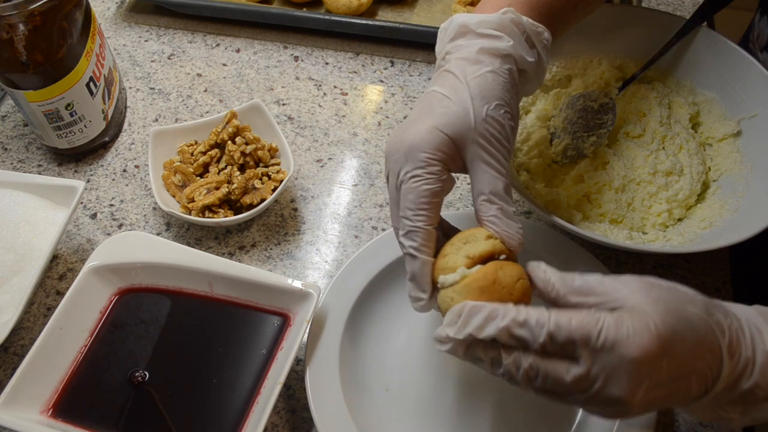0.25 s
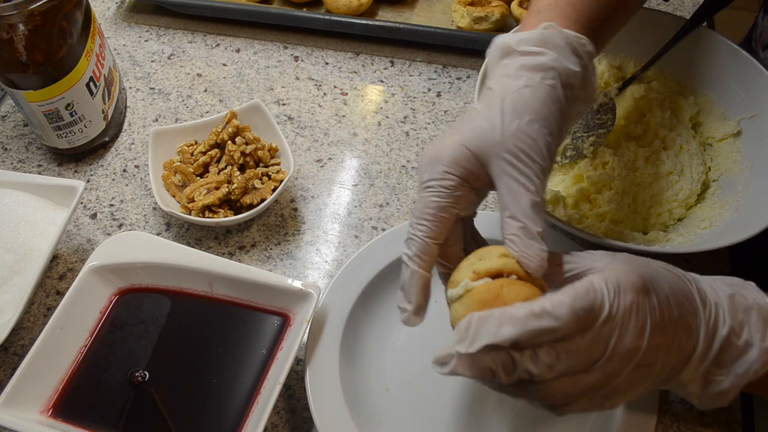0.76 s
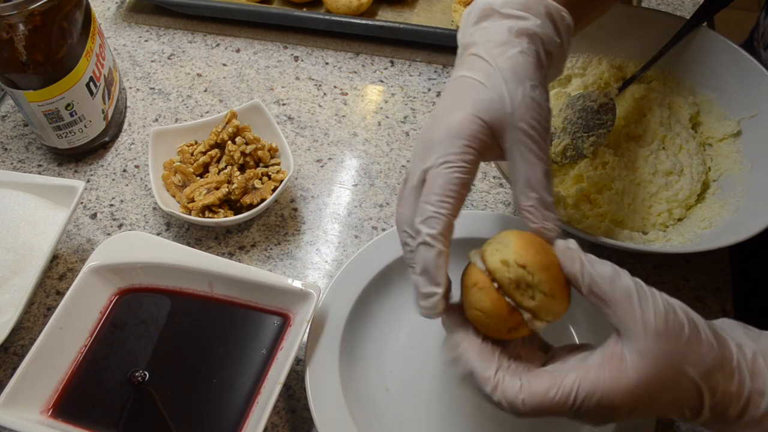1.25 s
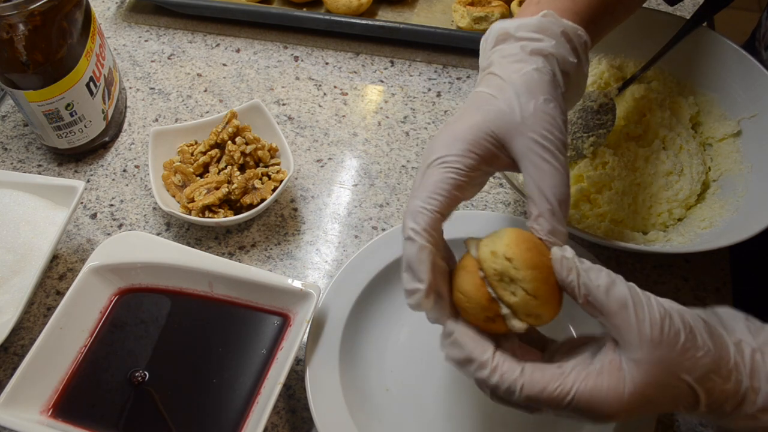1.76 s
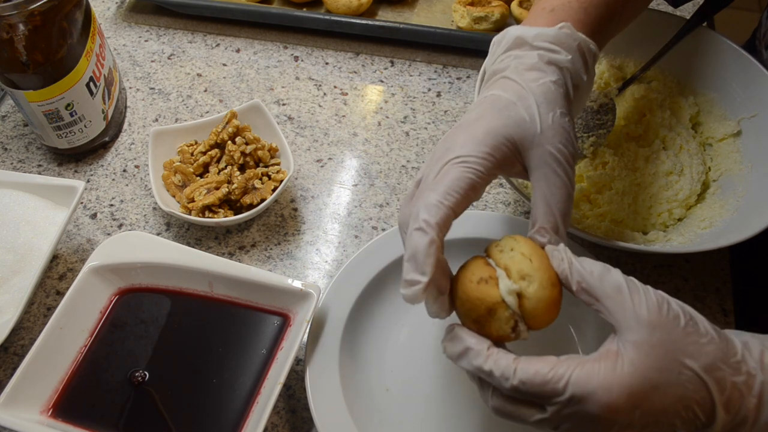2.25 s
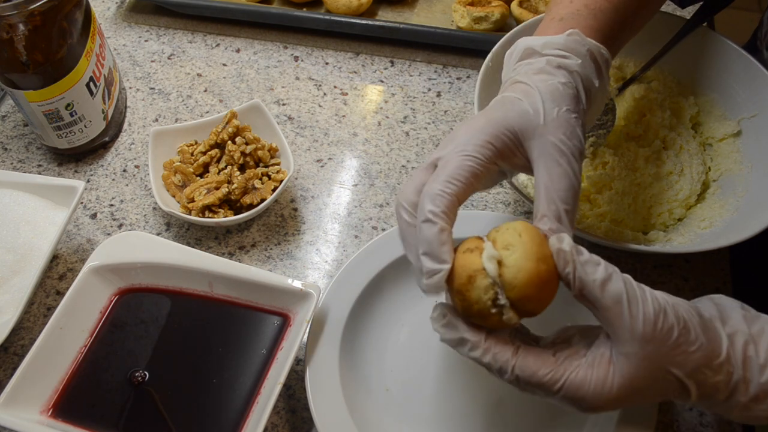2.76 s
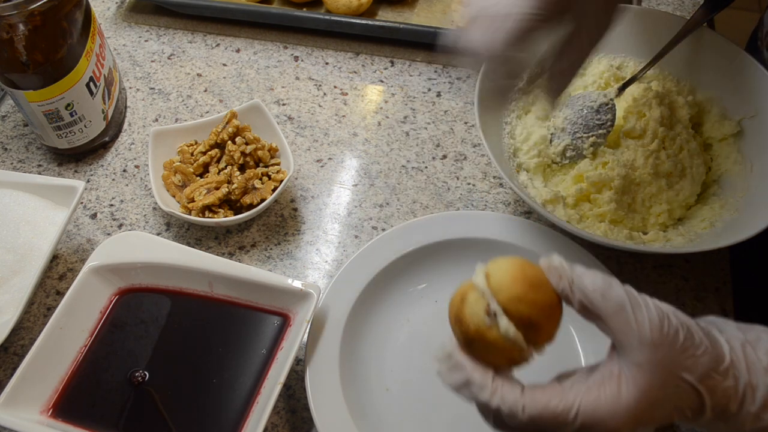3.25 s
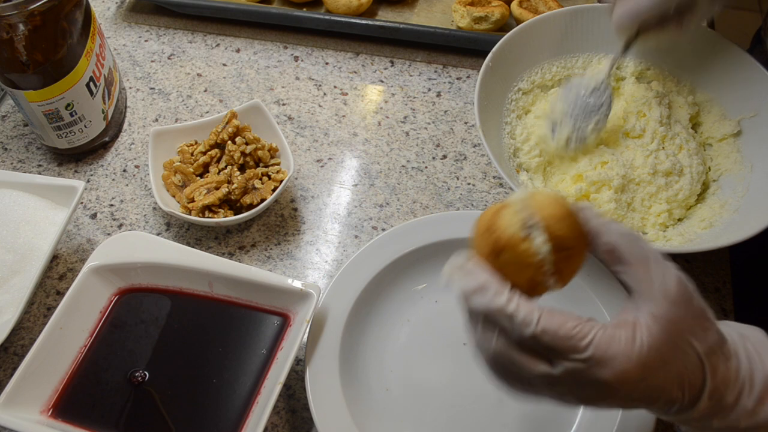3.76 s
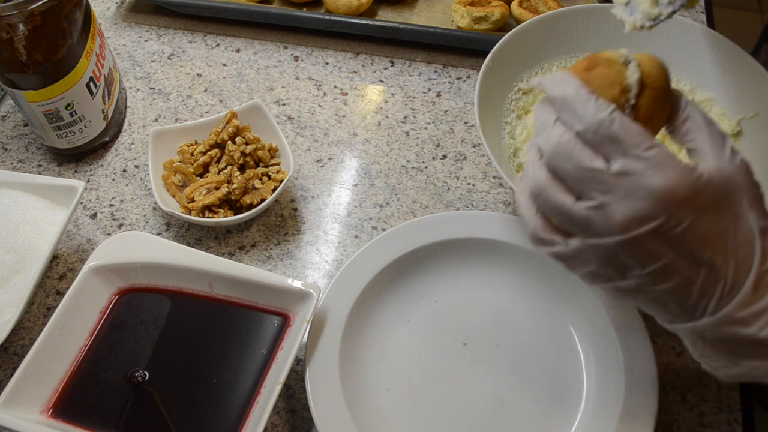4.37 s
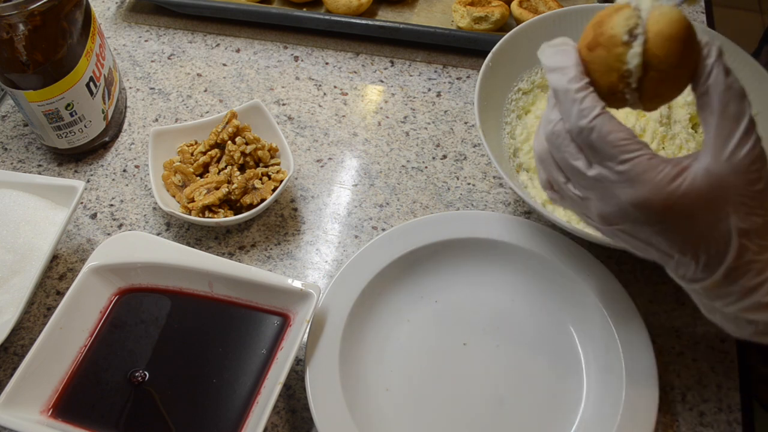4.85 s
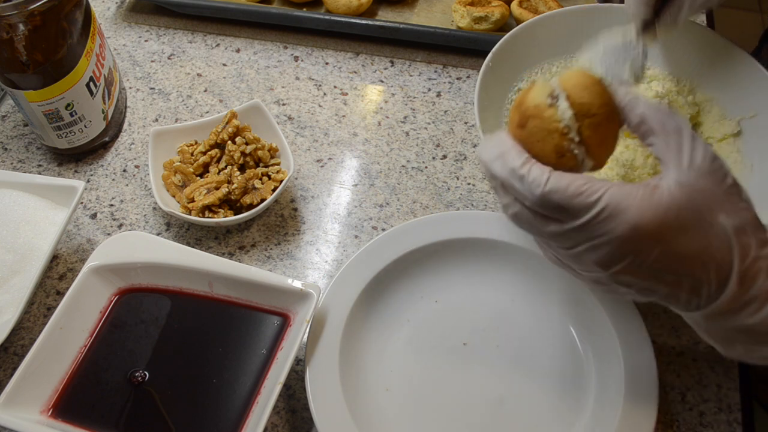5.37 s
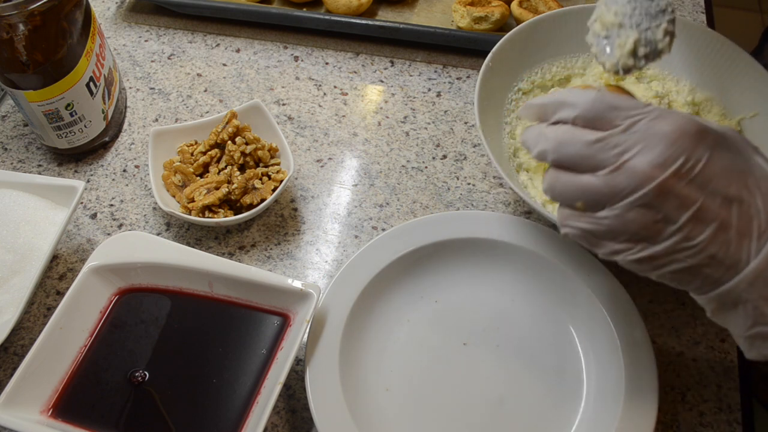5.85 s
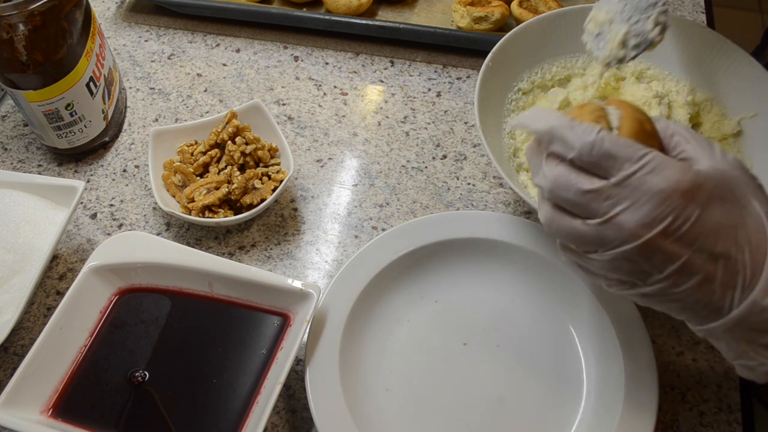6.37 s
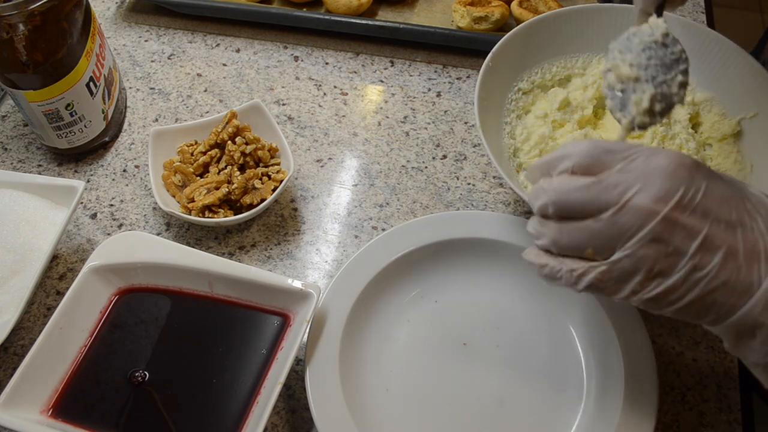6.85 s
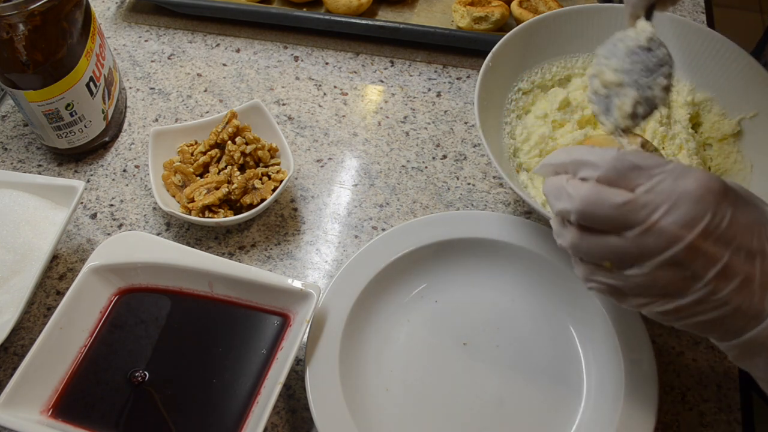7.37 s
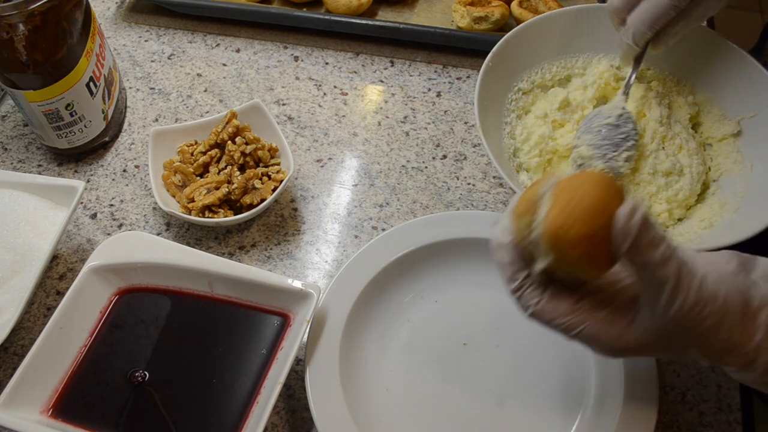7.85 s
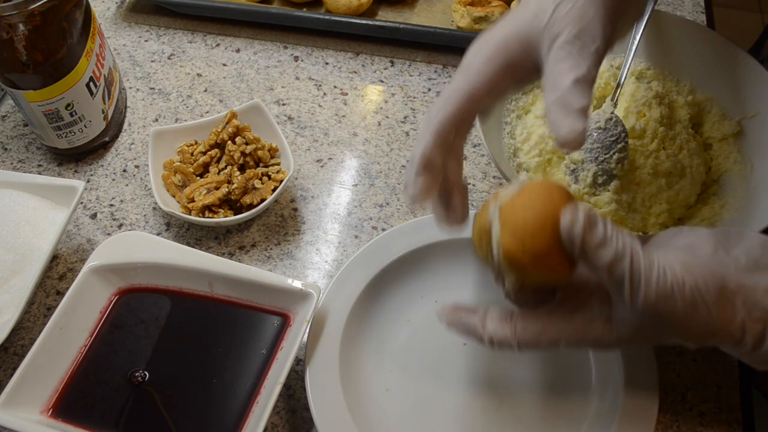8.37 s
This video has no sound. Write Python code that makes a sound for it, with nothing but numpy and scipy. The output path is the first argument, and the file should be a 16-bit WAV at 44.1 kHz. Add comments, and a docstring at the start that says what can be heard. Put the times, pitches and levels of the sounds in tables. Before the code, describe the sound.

In a small hard-walled kitchen, a fridge hums under steady low air noise and a wall clock ticks every second. Thin gloves rub a pastry with faint squeaks and snaps. A spoon bumps and scrapes dully in a filled bowl, and near the end drops against china with a loud clank. Close microphone, short room reverberation.

```python
"""A fridge hums under a rush of air; a spoon bumps in a bowl of flakes and a wall clock begins to step each second.
Thin gloves then rub round a filled pastry in a small, hard-walled kitchen: stick-slip noise, with chirps and snaps.
The spoon scrapes as force-shaped friction noise and bumps as damped modes of the bowl.
Near the end it is let go and clanks on the china: free modes, a crack and a thud.
The clock is resonant chatter; the fridge is wavering tones over filtered noise."""
import sys
import numpy as np
from scipy import signal
from scipy.fft import rfft, irfft
from scipy.io import wavfile

SR = 44100
rng = np.random.default_rng(int(sys.argv[2]) if len(sys.argv) > 2 else 0)


def waveform_to_disk(signal):
    """Save audio, clipped to [-1, 1], as 16-bit WAV at the path in sys.argv[1]."""
    frames = np.transpose(np.atleast_2d(signal))
    scaled = np.clip(frames, -1, 1) * 32767
    samples = np.round(scaled).astype(np.int16)
    wavfile.write(sys.argv[1], SR, samples)


N = 379389
T = np.arange(N) / SR  # time in seconds

# Strokes of the gloved fingers. Each row: middle in seconds, time to fall to e^-2 in seconds, relative level in dB.
GLOVE_STROKES = [(.8, .07, -80), (0.999, 0.043, -70), (1.22, 0.036, -66.5), (1.3, .068, -63),
                 (1.427, 0.063, -67), (1.6, 0.074, -74), (1.865, 0.034, -66.5), (1.999, 0.032, -66),
                 (2.052, 0.05, -67), (2.225, 0.023, -72), (2.535, .04, -71.5), (2.685, 0.062, -68.5),
                 (2.745, 0.029, -63.5), (2.815, 0.074, -71.5), (2.941, .018, -65.5), (2.982, 0.037, -66),
                 (3.067, 0.044, -67.5), (3.24, 0.1, -74), (3.515, 0.019, -70), (3.65, 0.038, -75),
                 (3.805, 0.056, -66), (3.853, 0.05, -62.5), (3.95, .018, -68), (4.027, .04, -72.5),
                 (5.344, 0.084, -70), (5.44, 0.069, -69.5), (5.574, .05, -73), (5.757, .06, -78),
                 (6.068, .04, -69), (6.135, .035, -72), (6.23, 0.067, -69.5), (6.566, 0.11, -74),
                 (6.802, 0.039, -71), (6.873, 0.042, -69), (6.943, 0.042, -65), (7.02, 0.066, -68),
                 (7.42, 0.046, -74), (7.548, 0.031, -68), (7.659, 0.042, -73.5), (7.74, 0.11, -69),
                 (7.923, .025, -64)]
# Spectrum of the fine hiss of glove on glove. Each row: frequency in Hz, relative density in dB per Hz.
GLOVE_HISS_SPECTRUM = [(1500, -10.5), (3000, 4.5), (4500, 3), (6000, -4.5), (9000, -4.5), (12500, -8.5),
                       (15500, -24)]
# Spectrum of the duller rub of glove on crust. Each row: frequency in Hz, relative density in dB per Hz.
CRUST_RUB_SPECTRUM = [(200, -11.5), (500, -2), (1300, 3), (2200, 6.5), (4000, -15), (6500, -16),
                      (12000, -29)]
# The rubber catches and chirps. Each row: middle in seconds, time to fall to e^-2 in seconds,
# resonance in Hz, its width in Hz, level in dB.
RUBBER_CATCHES = [(1.44, .06, 2300, 1400, -66), (1.59, 0.1, 4360, 1990, -71),
                  (1.873, 0.024, 4320, 1900, -63.5), (2.064, 0.052, 3600, 2600, -63.5),
                  (2.992, 0.022, 4500, 1600, -64.5), (5.57, 0.039, 4030, 900, -68.5),
                  (6.055, 0.04, 4650, 700, -67.5), (6.804, 0.028, 4820, 2200, -62),
                  (6.942, 0.015, 4320, 1100, -56.5), (7.02, 0.035, 8400, 2000, -68.5),
                  (7.65, 0.026, 9900, 5000, -67)]
# Creases of the glove snap. Each row: start in seconds, level in dB, resonance in Hz.
CREASE_SNAPS = [(0.777, -63, 6000), (1.009, -52, 5000), (2.225, -60, 7040), (3.679, -59, 6960),
                (6.96, -47, 4200), (7.929, -54, 2493), (8.2518, -48, 7850)]
# Pushes of the spoon through the flakes. Each row: greatest force in seconds, build-up in seconds,
# relative level in dB.
SPOON_PUSHES = [(3.625, .025, -55), (4.68, .16, -58.5), (4.81, 0.031, -55.5), (4.9, 0.093, -52.5),
                (5.05, .025, -52.5), (6.02, 0.032, -59), (6.145, 0.082, -53), (7.42, .11, -51),
                (7.53, 0.048, -58)]
# Spectrum of spoon on flakes and of the dull knock. Each row: frequency in Hz, relative density in dB per Hz.
SCRAPE_SPECTRUM = [(50, -40), (200, -9), (450, 0), (800, 7.5), (1300, 2), (2300, -2), (3200, -6.5),
                   (4500, -19.5), (9000, -35)]
# Bumps of the spoon in the filled bowl. Each row: start in seconds, ring gain in dB, dull knock gain in dB,
# softness as a cut-off in Hz.
SPOON_BUMPS = [(0.311, -62, -60, 3000), (0.319, -55, -53, 3400), (3.588, -57, -51, 8000),
               (3.604, -49, -44.5, 8000), (5.026, -63, -53, 2700), (5.046, -59, -48, 2700),
               (5.975, -55, -43, 3000), (6.148, -62, -54, 5000), (7.231, -53, -42, 1700)]
# Modes of the bowl under a resting spoon. Each row: frequency in Hz, relative level in dB, 60 dB decay in seconds.
DAMPED_BOWL_MODES = [(370, -7, .1), (700, -7, .06), (824, -3, .07), (1530, -6, .08), (1690, -4, .06),
                     (2013, -10, .06), (2600, -7, .05), (2800, -7, .08), (3150, -9, .05), (3483, -8, .1),
                     (4350, -9, .11), (5518, -15, .16), (8210, -21, .14)]
# Modes of the dropped spoon and the bowl ringing freely; close pairs beat.
# Each row: frequency in Hz, relative level in dB, 60 dB decay in seconds.
FREE_CHINA_MODES = [(322, -23, .3), (441, -21, .33), (641, -25, .38), (797, -25, .33), (850, -17, .22),
                    (926, -14, .33), (1565, -19, .35), (1597, -25, .33), (1927, -20, .22), (2322, -9, .2),
                    (2338, -15, .36), (3166, -18, .22), (3245, -16, .33), (3268, -21, .2), (4204, -14, .17),
                    (4281, -3, .18), (4302, -11, .15), (5425, -8, .14), (5449, -5, .26), (6740, -26, .19),
                    (7677, -23, .1), (8132, -15, .17), (8180, -19, .13), (9615, -20, .15),
                    (11250, -23, .15), (12915, -32, .12), (12950, -25, .16), (14790, -36, .17)]
# The counter and the dense, short modes under the blow. Each row: frequency in Hz, relative density in dB per Hz.
THUD_SPECTRUM = [(40, -20), (110, -13), (210, -7), (330, 1), (560, -3), (850, 7), (1100, 4), (1350, -6),
                 (1900, -1), (2700, -5), (3600, -9), (4600, -4), (6300, -16), (8200, -17), (10300, -28),
                 (14000, -39)]
# The first contact of steel and glaze. Each row: frequency in Hz, relative density in dB per Hz.
CRACK_SPECTRUM = [(40, -28), (200, -8), (600, -0.5), (2500, 0.5), (4800, 10.5), (6500, -3), (8400, -3.5),
                  (10400, -18.5), (11600, -10), (12900, -11.5), (13600, -29), (16000, -35)]
# The clock movement whirs, then latches. Each row: middle in seconds after the step, resonance in Hz,
# its width in Hz, level in dB before the strength of the step, time to fall to e^-2 in seconds.
CLOCK_PARTS = [(-.055, 2765, 110, -67, 0.026), (-.015, 2015, 870, -63.5, 0.12), (.01, 1233, 279, -55, 0.02),
               (0.027, 1257, 240, -63.5, 0.018), (0.079, 1204, 149, -71, 0.042),
               (.01, 3600, 4500, -93, 0.17)]
# Strength of each clock step in turn. Each entry: relative level in dB.
STEP_STRENGTHS = [2.5, -1.5, -2.5, 1, 0.5, -2, 0, -1.5, 3]
# Fridge compressor and its fan. Each row: mean frequency in Hz, rms level in dB about which it wavers.
FRIDGE_LINES = [(48.9, -77), (93.2, -75), (186.3, -71), (372.6, -69.5), (465.8, -71), (559, -78),
                (652.2, -75), (688, -82), (838.6, -76.5), (1024.8, -72)]
# Spectrum of the steady air noise of the kitchen. Each row: frequency in Hz, relative density in dB per Hz.
AIR_SPECTRUM = [(25, -31), (60, -14.5), (82, -23.5), (100, -8), (125, 2.5), (200, -3.5), (300, 1),
                (400, -11), (800, -10.5), (1500, -17), (2800, -24), (5500, -38.5), (10000, -43.5),
                (14000, -46.5), (16000, -44)]


def gloves(hiss_db=0, crust_db=1, uneven_db=3.5, snap_t60=0.0059, snap_width_hz=4500):
    """Stick-slip friction: rubber slips in tiny steps; now and then it catches, or a crease snaps."""
    hold_db = -86.5  # faint rubbing of fingers that only hold the pastry
    power = undb(hold_db) ** 2
    for s, length, db in GLOVE_STROKES:
        power = power + (undb(db) * swell(T, s, length)) ** 2
    effort = np.sqrt(power)

    # the two contacts grip unevenly, so the colour of a stroke keeps shifting
    hiss_grip = undb(hiss_db + uneven_db * wander(rate=98))
    hiss = hiss_grip * colour(friction(rate=16000, spread_db=0), GLOVE_HISS_SPECTRUM)
    crust_grip = undb(crust_db + uneven_db * wander(rate=21))
    crust = crust_grip * colour(friction(rate=8000, spread_db=5.5), CRUST_RUB_SPECTRUM)
    # small folds in the rubber give way one by one
    crinkle = undb(-6) * colour(friction(rate=160, spread_db=2), GLOVE_HISS_SPECTRUM)
    out = effort * (hiss + crust + crinkle)

    slips = rng.standard_normal(N)
    for s, length, hz, width, db in RUBBER_CATCHES:
        out += undb(db) * swell(T, s, length) * resonate(slips, hz, width)

    t = T[:SR // 10]
    for s, db, hz in CREASE_SNAPS:
        burst = resonate(rng.standard_normal(len(t)), hz, snap_width_hz)
        add(out, s, undb(db) * fade(t, snap_t60) * burst)
    return out


def scooping(scrape_db=-2, release_s=.045, knock_t60=.045):
    """Friction noise follows the force of the spoon; bumps excite bowl modes that the flakes damp."""
    force = sum(undb(db) * push(s, build, release_s) for s, build, db in SPOON_PUSHES)
    out = undb(scrape_db) * force * colour(friction(rate=5000, spread_db=1.9), SCRAPE_SPECTRUM)
    for s, ring_db, knock_db, soft_hz in SPOON_BUMPS:
        burst = rng.standard_normal(SR) * fade(T[:SR], knock_t60)
        knock = undb(knock_db) * colour(burst, SCRAPE_SPECTRUM)
        bump = undb(ring_db) * ring(DAMPED_BOWL_MODES) + knock
        b, a = signal.butter(2, soft_hz, fs=SR)  # a softer contact excites less treble
        add(out, s, signal.lfilter(b, a, bump))
    return out


def dropped_spoon(thud_db=-4.5, thud_t60=0.17, crack_db=-4, crack_t60=0.0067):
    """Impact excitation of steel on china: a crack, the free modes and a thud through the counter."""
    drop_s, drop_db = 7.9724, -8
    t, out = T[:SR], np.zeros(N)
    thud = undb(thud_db) * colour(rng.standard_normal(SR) * fade(t, thud_t60), THUD_SPECTRUM)
    crack = undb(crack_db) * colour(rng.standard_normal(SR) * fade(t, crack_t60), CRACK_SPECTRUM)
    add(out, drop_s, undb(drop_db) * (ring(FREE_CHINA_MODES) + thud + crack))
    return out


def clock(first_step_s=0.5034):
    """Resonance of a plastic case: once a second the chatter of the gears excites it."""
    out, chatter = np.zeros(N), rng.standard_normal(N)
    # index of the nearest step; the steps are one second apart
    step = np.clip(np.round(T - first_step_s), 0, len(STEP_STRENGTHS) - 1).astype(int)
    since_step = T - first_step_s - step
    for lag, hz, width, db, length in CLOCK_PARTS:
        out += undb(db) * swell(since_step, lag, length) * resonate(chatter, hz, width)
    return out * undb(STEP_STRENGTHS)[step]


def fridge(air_db=-55.5, waver_db=2, drift_hz=.7):
    """Tones modulated in frequency and level: motor lines waver over the steady rush of air."""
    out = undb(air_db) * unit(colour(rng.standard_normal(N), AIR_SPECTRUM))
    for hz, db in FRIDGE_LINES:
        phase = 2 * np.pi * np.cumsum(hz + drift_hz * wander(rate=13)) / SR
        level = undb(db + waver_db * wander(rate=6.4))
        out += level * np.sqrt(2) * np.sin(phase)  # root two gives the sine rms 1
    return out


def kitchen(x, wet_db, t60_low=.44, t60_high=.26, split_hz=3000):
    """Reverberation: direct sound plus a short tail from the walls, whose treble dies first."""
    t = T[:SR]
    low_pass = signal.butter(4, split_hz, "low", fs=SR, output="sos")
    high_pass = signal.butter(4, split_hz, "high", fs=SR, output="sos")
    low = signal.sosfilt(low_pass, rng.standard_normal(SR))
    high = signal.sosfilt(high_pass, rng.standard_normal(SR))
    tail = low * fade(t, t60_low) + high * fade(t, t60_high)
    tail *= 1 - fade(t, 0.034)  # the first reflections take a few milliseconds to build up
    return x + undb(wet_db) * signal.fftconvolve(x, tail / np.linalg.norm(tail))[:N]


def friction(rate, spread_db):
    """Stick-slip as random impulses: `rate` tiny slips a second of uneven size, at rms 1."""
    slips = rng.random(N) < rate / SR
    size_db = spread_db * np.minimum(rng.exponential(size=N), 4)
    return unit(slips * rng.standard_normal(N) * undb(size_db))


def ring(modes):
    """Modal synthesis for one second; bending waves reach the rim with phase growing as root frequency."""
    t = T[:SR]
    out = np.zeros(SR)
    for hz, db, t60 in modes:
        out += undb(db) * fade(t, t60) * np.sin(2 * np.pi * hz * t + np.sqrt(hz))
    return out * (1 - fade(t, .004))  # soft onset


def resonate(x, hz, width_hz):
    """Resonance: two equal second-order peaks in series for steep sides, at rms 1."""
    b, a = signal.iirpeak(hz, hz / width_hz / np.sqrt(.5) / 2, fs=SR)
    return unit(signal.lfilter(b, a, signal.lfilter(b, a, x)))


def colour(x, points):
    """Minimum-phase filtering through (Hz, dB) points, with unit power gain."""
    hz, db = np.transpose(points)
    size = 4096
    bins_hz = np.fft.rfftfreq(size, 1 / SR)
    gain = unit(undb(np.interp(np.log(bins_hz + 1), np.log(hz), db)))
    # folding the cepstrum onto positive time makes the filter causal
    cepstrum = irfft(np.log(gain))
    cepstrum[1:size // 2] *= 2
    cepstrum[size // 2 + 1:] = 0
    response = irfft(np.exp(rfft(cepstrum)))
    return signal.fftconvolve(x, response)[:len(x)]


def wander(rate):
    """Slow random modulation: straight lines between `rate` random values a second, at rms 1."""
    return unit(np.interp(T * rate, np.arange(2000), rng.standard_normal(2000)))


def push(peak_s, build_s, release_s):
    """Asymmetric force pulse: it builds up to a peak, then lets go."""
    return swell(T, peak_s, np.where(T < peak_s, build_s, release_s))


def swell(t, centre, length):
    """Gaussian envelope: a smooth rise and fall round a moment, down to e^-2 at `length` from it."""
    return np.exp(-2 * ((t - centre) / length) ** 2)


def fade(t, t60):
    """Exponential decay by 60 dB in t60 seconds."""
    return np.exp(-np.log(1000) * t / t60)


def undb(db):
    """Decibels to amplitude gain."""
    return 10 ** (np.asarray(db) / 20)


def unit(x):
    """Normalisation to rms 1."""
    return x / np.sqrt(np.mean(x ** 2))


def add(out, s, sound):
    """Superposition: mix a sound in at time s."""
    i = int(s * SR)
    out[i:i + len(sound)] += sound[:N - i]


def scene():
    """Superposition of the sources, each but the fridge with its own share of reverberation."""
    hands = kitchen(gloves(), wet_db=-5.5) + kitchen(scooping(), wet_db=-6.5)
    clank = kitchen(dropped_spoon(), wet_db=-7, t60_low=.43, t60_high=.25)
    return (hands + clank + kitchen(clock(), wet_db=-5.5) + fridge())[None]


def record(dry, limit=.85, top_hz=15700):
    """Hard limiting of any peak beyond the limit, then a steep low-pass that cuts the top."""
    low_pass = signal.ellip(8, .2, 70, top_hz, fs=SR, output="sos")
    return signal.sosfilt(low_pass, np.clip(dry, -limit, limit))


dry = scene()
out = record(dry)
waveform_to_disk(out)
```